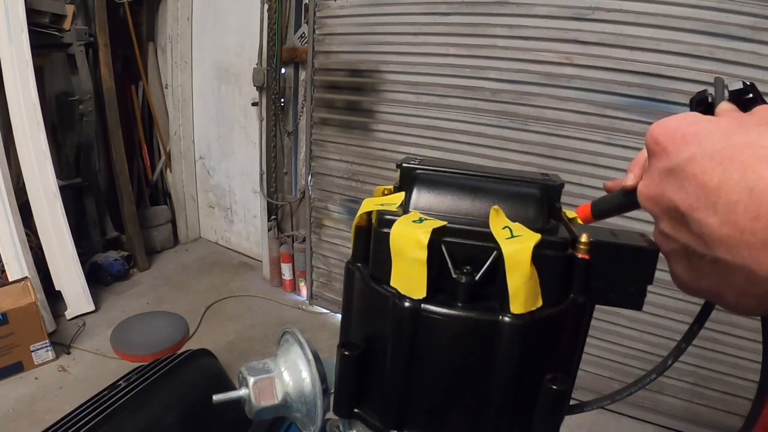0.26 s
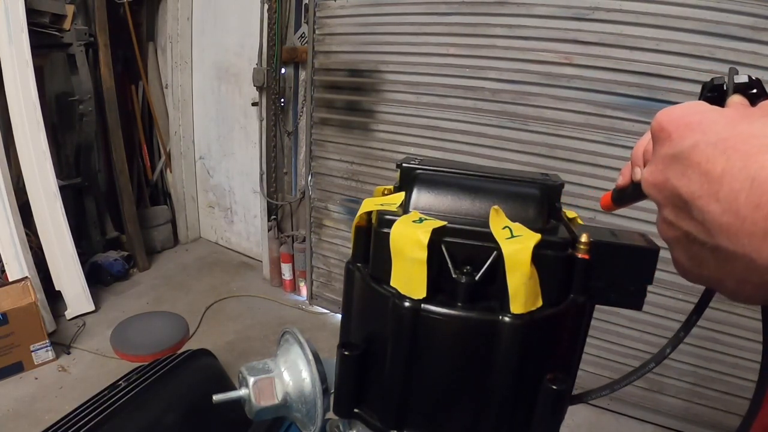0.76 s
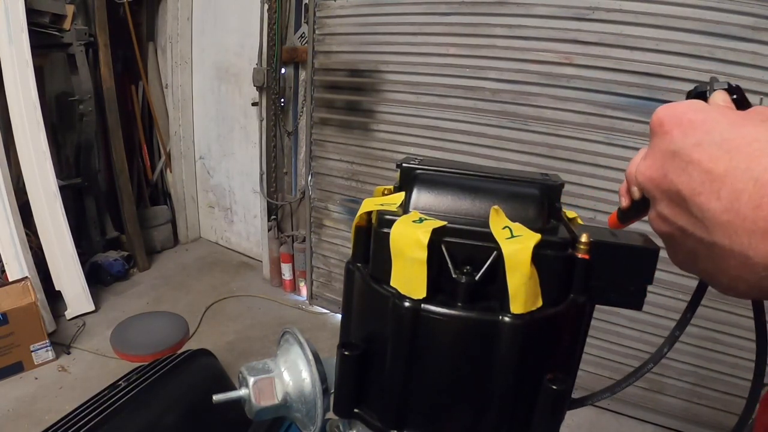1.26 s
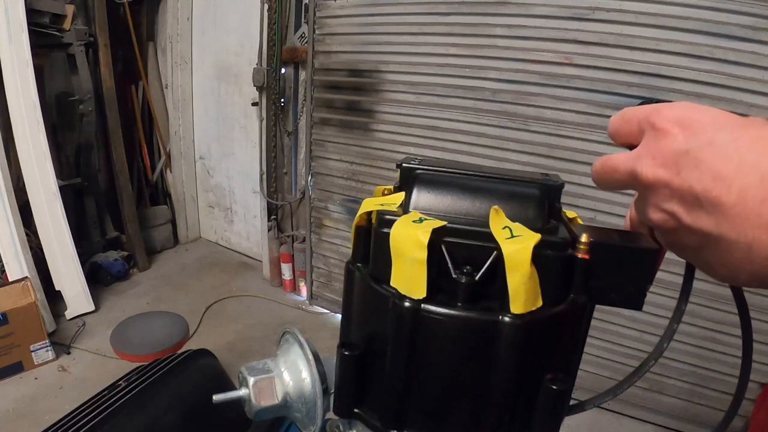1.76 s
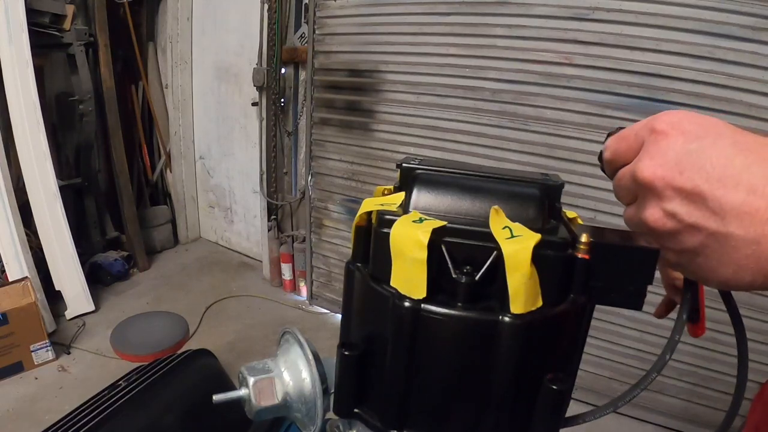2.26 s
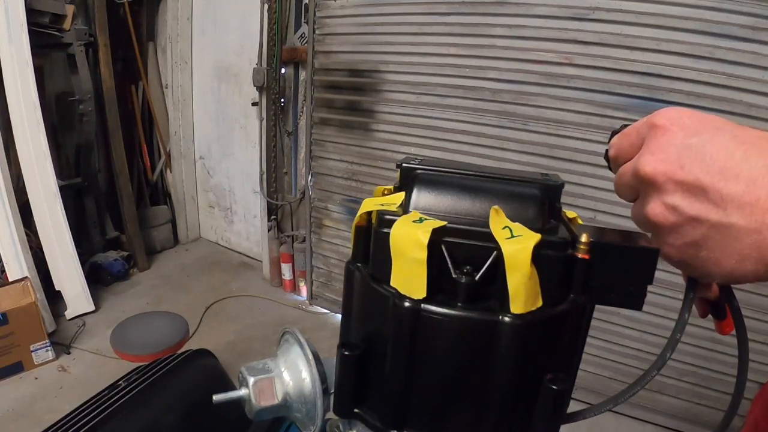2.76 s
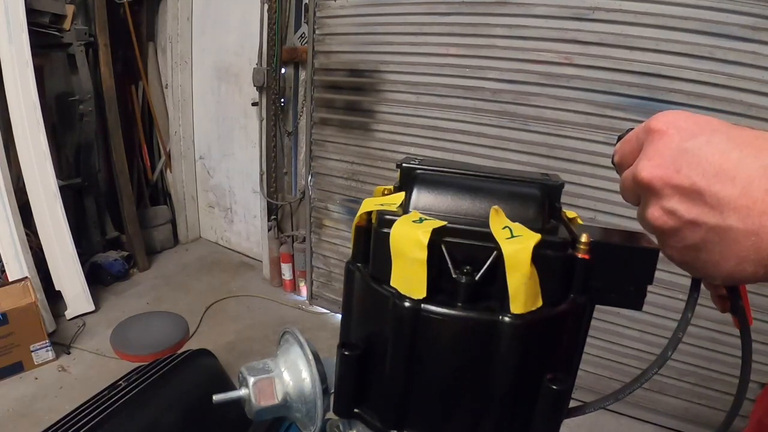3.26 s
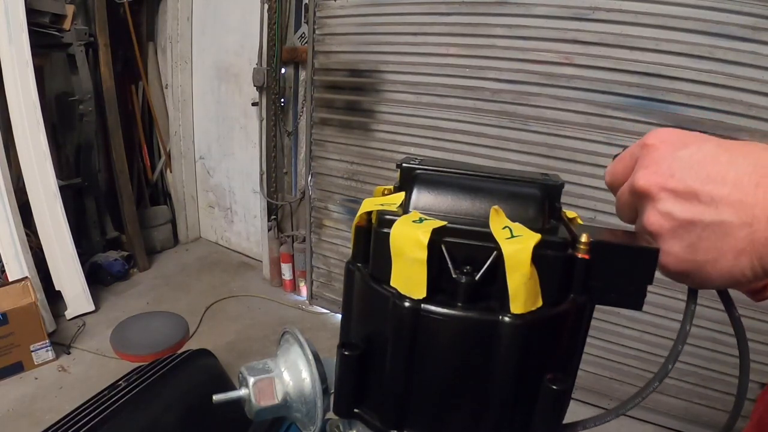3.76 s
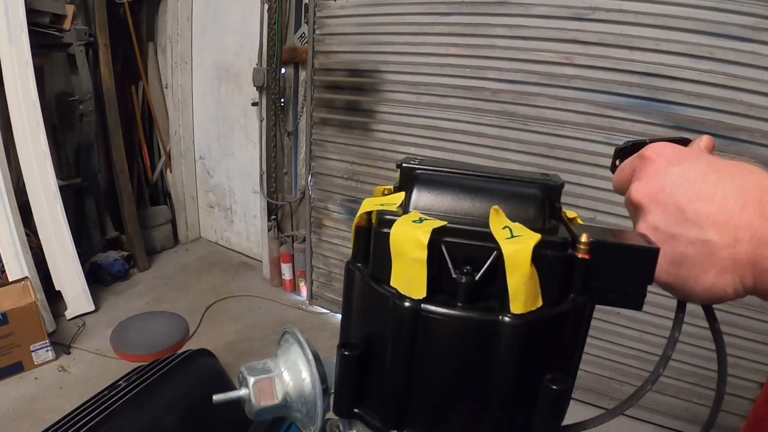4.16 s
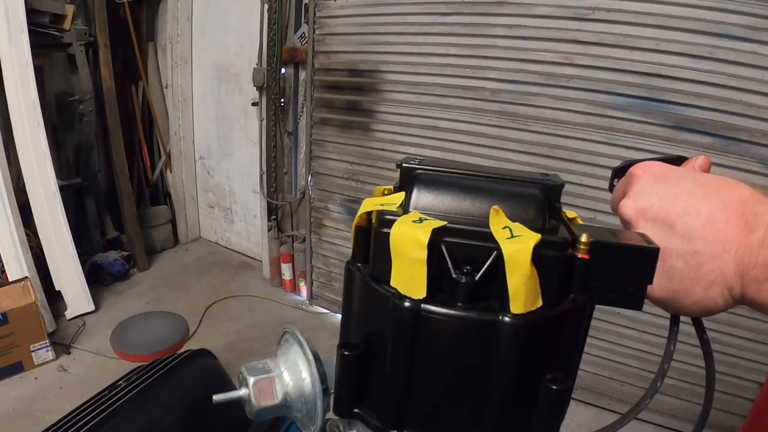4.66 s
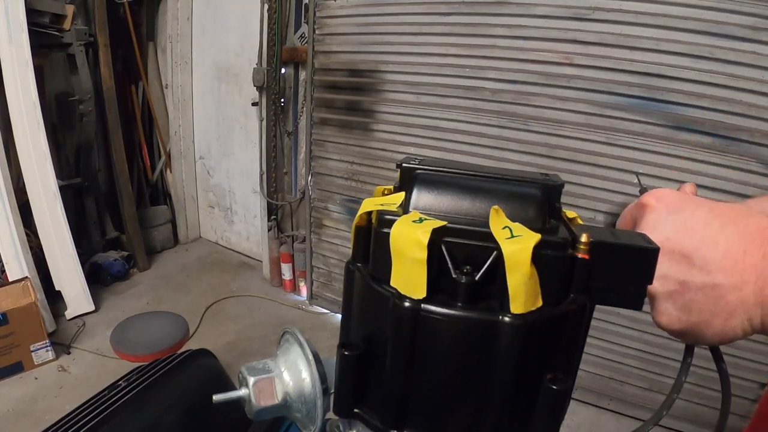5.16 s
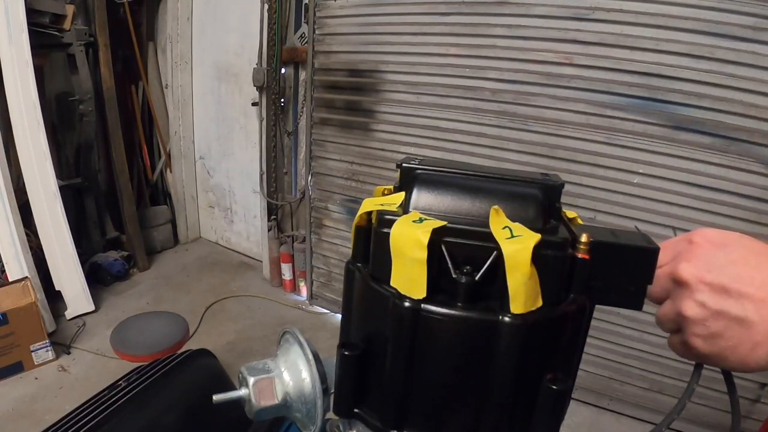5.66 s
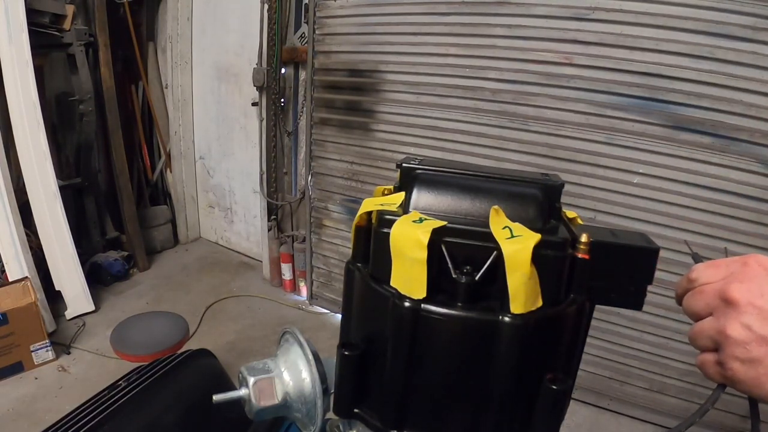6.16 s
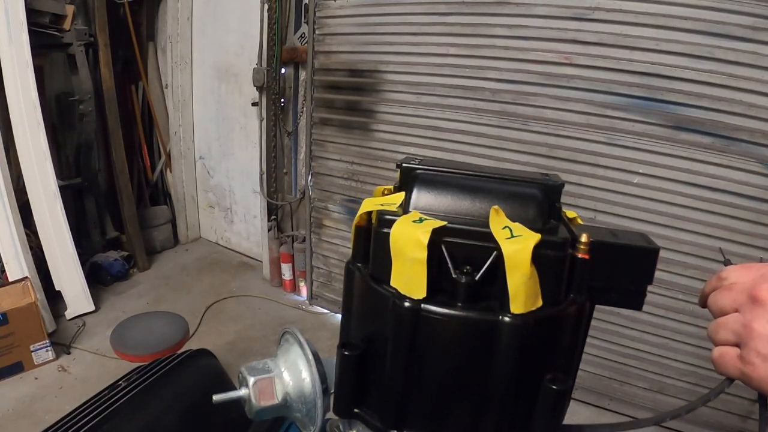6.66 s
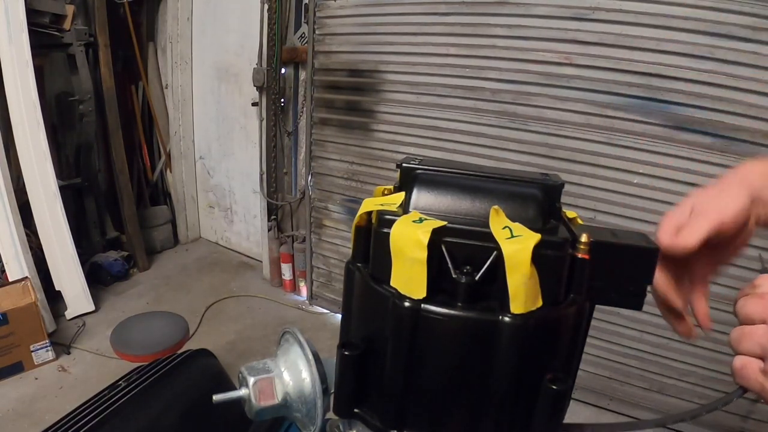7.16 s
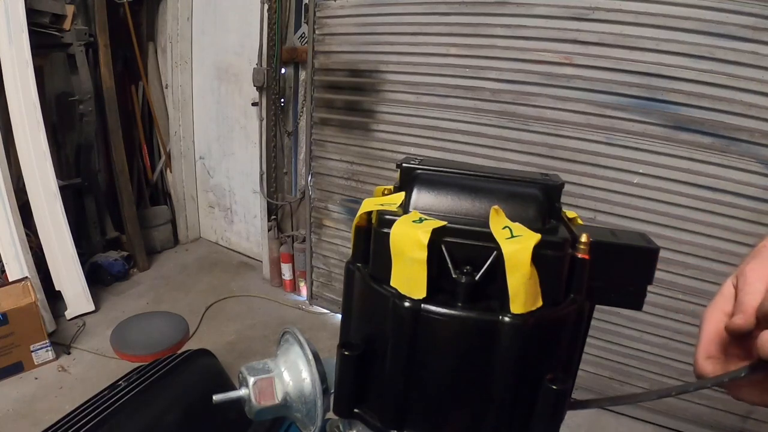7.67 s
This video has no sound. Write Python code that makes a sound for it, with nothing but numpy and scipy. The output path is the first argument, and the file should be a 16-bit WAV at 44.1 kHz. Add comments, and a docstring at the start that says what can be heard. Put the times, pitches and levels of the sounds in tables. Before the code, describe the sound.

Hand pliers ratchet on a cable terminal near the microphone, first in separate metallic clicks, then in a fast burst with a thin squeak. They slip off with a short scrape and spring open with a quick run of clicks, then land on a work top, knocking and settling. Soft rubbing of hands on rubber, steady room air and a low hum fill the slightly reverberant workshop.

```python
"""Ratcheting crimp pliers in a workshop.

The pliers are squeezed on a cable terminal: the pawl clicks over its teeth and rings the steel,
the terminal squeaks, the jaws slip off. The ratchet runs through once more as the handles spring
open; the pliers clatter on the work top, and a rough, ringing wash lingers after the knocks.
Hands rub over cable and grips. Behind it: room air, a low rumble, a swelling drone, a faint hum."""
import sys
import numpy as np
from scipy import signal
from scipy.fft import rfft, irfft
from scipy.io import wavfile
from scipy.ndimage import uniform_filter1d

SR = 44100
rng = np.random.default_rng(int(sys.argv[2]) if len(sys.argv) > 2 else 0)


def generate_wav(sig):
    """Save sig (samples, or channels by samples) to the path in sys.argv[1] as 16-bit PCM at SR."""
    pcm = np.round(np.clip(np.atleast_2d(sig).T, -1, 1) * 32767).astype(np.int16)
    wavfile.write(sys.argv[1], SR, pcm)


N = 349272
TIME_S = np.arange(N) / SR
FREQ_HZ = np.fft.rfftfreq(N, 1 / SR)

# Blows. A hard one tilts towards the treble; the spot struck favours one band.
# (time [s], contact time [s], relative energy [dB], tilt [dB/octave], favoured frequency [Hz])
RATCHET_CLICKS = [(.2444, .0015, -21.5, 2.5, 5000), (.4839, .001, -25, -5, 2400),
                  (.5797, 0.0037, -28.5, -4, 2950), (.6455, 0.0026, -30, -4.5, 2850),
                  (.8235, 0.0012, 9.5, 1.5, 2610), (1.0004, .0009, 9.5, 3, 2740),
                  (1.2313, 0.00088, 8, 4, 2870), (2.0626, 0.0009, -35, -0.5, 4000),
                  (3.5657, 0.00086, 7.5, 0.6, 4100), (3.6039, .0008, 10, 3.4, 3800),
                  (3.6313, .0008, 10, 4, 3750), (3.6593, 0.00066, 7.5, 2, 3750),
                  (3.7877, 0.0024, 8.5, -0.2, 5600), (3.8621, 0.0016, 11, 0.5, 3600),
                  (5.1013, .0009, -8.5, 4.5, 1600), (5.1718, 0.00053, 5, -2, 2370),
                  (5.2951, 0.00067, 5.5, -1.5, 4000)]  # pawl and jaws
JAW_SLIPS = [(4.8205, 0.0078, -3.5, -0.5, 1200), (4.825, 0.0017, 2.5, -0.3, 9000),
             (4.8335, 0.0029, -1, -1, 200), (4.84, 0.0036, -10, 3, 3000)]
BENCH_KNOCKS = [(6.2782, 0.0015, -2, 1.5, 850), (6.289, 0.003, 16.5, 1.4, 2130),
                (6.4838, 0.0019, 10, 0, 875), (6.5172, 0.0037, 4, -1, 695), (6.527, 0.0066, 10, -3.5, 700),
                (6.553, 0.0086, 3, -1, 3800), (6.5603, 0.0072, 18.5, 1.3, 468),
                (6.5755, 0.0054, 9.7, -0.5, 730), (6.588, 0.0077, 2, -1.5, 1400),
                (6.5985, 0.003, 3.5, 2, 4200), (6.6155, .0024, 3.5, -1, 330), (6.6795, 0.0026, 3, 5, 706),
                (6.696, 0.02, 7, -2.5, 380), (6.7165, .003, -0.5, 4.5, 550), (6.727, 0.0045, 2.5, -.3, 444)]  # pliers land, tip over, settle

# Spectral outlines of the bodies: (frequency [Hz], relative level [dB])
PLIERS_OUTLINE = [(100, -31), (500, -20), (1000, -7.5), (1450, -12), (1650, 0), (1900, -5.5), (2400, -1),
                  (4500, -5), (6000, -7.5), (10600, -12), (11800, -24.5), (13600, -28.5), (15000, -42.5),
                  (16500, -55.5)]  # steel damped by the hand
TERMINAL_OUTLINE = [(40, -22), (130, 4), (340, 1), (560, -15.5), (1200, -10.5), (10500, -27), (12000, -28),
                    (16000, -46)]  # terminal with cable
BENCH_OUTLINE = [(60, -48.5), (160, -8), (230, 2.5), (300, -1), (400, -1.5), (560, -4.5), (800, -2),
                 (1100, -10), (1500, -12.5), (2800, -20), (4500, -30), (7000, -43), (11000, -57),
                 (16000, -84)]
# Their resonances: (frequency [Hz], bandwidth [Hz], peak re outline [dB])
PLIERS_MODES = [(1726, 120, 10.5), (2430, 250, -1.5), (2840, 180, 4.5), (3670, 280, 2.5), (4170, 140, 4),
                (4480, 222, 6.5), (4960, 300, -7), (5886, 740, -3.5), (7300, 490, 1), (8650, 498, 4.5),
                (10360, 670, -1.5)]
TERMINAL_MODES = [(193, 32, 7.5), (2760, 500, 6), (5000, 330, 9), (6310, 400, 9), (10000, 520, 16)]
BENCH_MODES = [(341.3, 12.6, 13), (446, 5.5, 5), (686, 82, 4.6), (770, 60, 4), (1494, 11, 8),
               (1975, 7.5, 6), (2616, 63, 9.5), (3500, 10.4, 6)]
# The pliers ring higher with the handles wide open: (time [s], mode frequency factor [1])
GRIP_TUNING = [(1.3, 1.025), (3.5, 0.94), (3.9, .99), (5.1, 0.98)]

# Envelopes: (start [s], length [s], level [dB])
TERMINAL_SQUEAKS = [(3.66, .085, -43.5), (3.785, 0.061, -41.5)]  # one per push
KNOCK_TAILS = [(6.295, 0.17, -38.5), (6.48, 0.21, -46), (6.67, 0.026, -38)]
HAND_RUBS = [(.13, 0.39, -77), (.55, 0.63, -67), (2.65, 0.41, -78.5), (5.87, 0.22, -57.5),
             (6.25, 0.76, -63.5), (7.08, 0.26, -63.5), (7.68, 0.14, -63.5)]
# Noise spectra: (frequency [Hz], relative level [dB])
KNOCK_TAIL_SPECTRUM = [(200, -25), (780, -4), (1000, -4), (1420, -1), (1650, 1), (2000, -7), (2280, 0),
                       (2630, -2), (3100, -6.5), (4600, -14.5), (6000, -31), (11000, -53), (16000, -53)]
RUB_SPECTRUM = [(500, -35.5), (2000, 1), (4400, -1.5), (6500, -8), (10500, -17), (13000, -28),
                (16000, -52.5)]
AIR_SPECTRUM = [(15, -48), (25, -19), (82, -9), (114, -6), (166, -2), (195, -1), (285, -4), (317, -8.5),
                (476, -17.5), (531, -24), (1100, -16), (1480, -20.5), (2160, -28.5), (8500, -55.5),
                (13000, -59.5), (14500, -81)]  # room air and far rumble

# Slow drift of the rumble: (time [s], gain [dB])
RUMBLE_DRIFT = [(.2, 1.5), (1.6, -2), (2.3, 1), (4.3, -2.5), (7, -0.5), (7.9, 1)]
# Swells of the drone: (start [s], length [s], level [dB], centre [Hz])
DRONE_SWELLS = [(5.854, 0.97, -45.5, 112.4), (7.28, 0.403, -41, 107.5)]
# Reflections from nearby surfaces: (delay [s], gain [1])
REFLECTIONS = [(.0021, 0.081), (.0086, .07), (0.0129, .04)]
# Reverberation decay: (frequency [Hz], T60 [s])
REVERB_T60 = [(200, 1.14), (800, 0.07), (2000, 0.69), (4500, 0.6142), (8000, 0.48), (12000, 0.4)]
# Reverberation strength: (frequency [Hz], gain [dB])
REVERB_GAIN = [(200, -12), (800, -9), (1700, -6.5), (2800, -8.5), (4300, -6.5), (7000, -7.5), (10000, -13),
               (14000, -14.5)]
# Microphone response: (frequency [Hz], gain [dB])
MIC_RESPONSE = [(100, -1), (12500, -0.5), (16000, -7)]


def ratchet():
    """Pawl and jaws strike and ring the steel pliers."""
    return gain_of(1.18) * blows(RATCHET_CLICKS + tooth_run(), PLIERS_OUTLINE, PLIERS_MODES,
                                 chatter=0.62, room_share=0.27, favour_db=7.5, favour_octaves=0.34,
                                 tuning=GRIP_TUNING)


def tooth_run(start_s=5.1904, teeth=6, step_s=0.0111, contact_s=0.0015):
    """Blow rows for the pawl running over its teeth as the handles spring open, each a little weaker."""
    first_db, fade_db_per_s, tilt_db_per_octave, favoured_hz = 7, 20.5, 0, 1296
    return [(start_s + t, contact_s, first_db - fade_db_per_s * t, tilt_db_per_octave, favoured_hz)
            for t in step_s * np.arange(teeth)]


def jaw_slip():
    """The jaws scrape off, ringing terminal and cable."""
    return gain_of(-1.1) * blows(JAW_SLIPS, TERMINAL_OUTLINE, TERMINAL_MODES, chatter=0.91,
                                 room_share=0.68, favour_db=7, favour_octaves=0.84)


def clatter():
    """Steel head and plastic grips knock on the work top."""
    return gain_of(-0.5) * blows(BENCH_KNOCKS, BENCH_OUTLINE, BENCH_MODES, chatter=0.57,
                                 room_share=1.0, favour_db=7.5, favour_octaves=1.0)


def blows(rows, outline, modes, chatter, room_share, favour_db, favour_octaves, tuning=None):
    """Impulses with contact chatter ring a body. Returns (direct, room send with modes x room_share)."""
    size = 16384
    t, hz = np.arange(size) / SR, np.fft.rfftfreq(size, 1 / SR)
    direct_and_send = np.zeros((2, N))
    for start_s, contact_s, energy_db, tilt_db_per_octave, favoured_hz in rows:
        octaves = np.log2((hz + 1) / favoured_hz)
        spot_db = favour_db * np.exp(-(octaves / favour_octaves) ** 2)
        outline_power = gain_of(curve_at(outline, hz) + tilt_db_per_octave * octaves + spot_db) ** 2
        shift = 1 if tuning is None else np.interp(start_s, *np.transpose(tuning))
        peaks = sum(gain_of(db) ** 2 / (1 + (2 * (hz - mode_hz * shift) / width_hz) ** 2)
                    for mode_hz, width_hz, db in modes)
        force = chatter * rng.standard_normal(size) * np.exp(-t / max(contact_s, 6e-4))
        force[0] += 1
        push = rfft(force)
        # Flattened: chatter spreads the blow in time without colouring it.
        push /= minimum_phase(np.sqrt(uniform_filter1d(abs(push) ** 2, 161)))
        for mix, share in zip(direct_and_send, (1, room_share)):
            body = minimum_phase(unit_rms(np.sqrt(outline_power * (1 + share * peaks))))
            add(mix, start_s, gain_of(energy_db) * irfft(push * body))
    return direct_and_send


def knock_tail():
    """A rough, ringing wash lingers after the knocks."""
    level = strokes(KNOCK_TAILS, rise_s=0.063, release_s=0.024)
    return level * gain_of(0.9 * wander(rate_hz=120)) * noise(KNOCK_TAIL_SPECTRUM)


def squeak(pitch_hz=970, sag_hz=27.3):
    """The terminal under load: a thin, unsteady tone that sags as it gets louder."""
    level = strokes(TERMINAL_SQUEAKS, rise_s=0.04, release_s=0.035)
    hz = pitch_hz - sag_hz * level / level.max()
    hz *= 1 + 0.003 * wander(rate_hz=50)
    return level * gain_of(3.3 * wander(rate_hz=50)) * tone(hz)


def hands():
    """Skin slides over rubber: a soft, uneven hiss."""
    level = strokes(HAND_RUBS, rise_s=0.027, release_s=0.094)
    return level * gain_of(1.5 * wander(rate_hz=50)) * noise(RUB_SPECTRUM)


def workshop(direct, send, build_s=0.0057):
    """Direct sound, near reflections and a diffuse tail with a decay time per band."""
    hz, t, noise_bands = signal.stft(rng.standard_normal(SR), SR, nperseg=256)
    onset = 1 - np.exp(-(t / build_s) ** 2)
    envelope = onset * gain_of(-60 * t / curve_at(REVERB_T60, hz)[:, None])
    band_energy = SR * np.mean(envelope ** 2, axis=1, keepdims=True)
    envelope *= gain_of(curve_at(REVERB_GAIN, hz))[:, None] / np.sqrt(band_energy)
    _, tail = signal.istft(noise_bands * envelope, SR, nperseg=256)
    heard = direct + signal.fftconvolve(send, tail)[:N]
    for delay_s, gain in REFLECTIONS:
        add(heard, delay_s, gain * direct)
    return heard


def room_air(level_db=-43.5, rumble_below_hz=450):
    """Steady air noise whose low end, the far rumble, wavers."""
    air = gain_of(level_db) * noise(AIR_SPECTRUM)
    rumble = signal.sosfiltfilt(signal.butter(2, rumble_below_hz, fs=SR, output="sos"), air)
    drift_db = np.interp(TIME_S, *np.transpose(RUMBLE_DRIFT)) + 1.4 * wander(rate_hz=6)
    return air + (gain_of(drift_db) - 1) * rumble


def drone(centre_hz=97, level_db=-59):
    """A faint, deep noise band with two slightly higher swells."""
    sound = gain_of(level_db) * noise_band(centre_hz)
    for *stroke, swell_hz in DRONE_SWELLS:
        sound += strokes([stroke], rise_s=0.18, release_s=0.15) * noise_band(swell_hz)
    return sound


def hum(pitch_hz=170.6, rise_at_s=3.73, rise_s=1.8, quiet_db=-56.5, loud_db=-42):
    """A wavering low tone that comes up half-way through and stays."""
    hz = pitch_hz + 0.6 * wander(rate_hz=2)
    level = np.interp(TIME_S, [rise_at_s, rise_at_s + rise_s], gain_of([quiet_db, loud_db]))
    return level * gain_of(0.63 * wander(rate_hz=6)) * tone(hz)


def strokes(rows, rise_s, release_s):
    """Summed envelopes: linear rise, hold, exponential release."""
    level = np.zeros(N)
    for start_s, length_s, db in rows:
        attack = np.clip((TIME_S - start_s) / rise_s, 0, 1)
        release = np.exp(-np.maximum(TIME_S - start_s - length_s, 0) / release_s)
        level += gain_of(db) * attack * release
    return level


def tone(hz):
    """Unit-rms sine following a pitch curve."""
    return np.sqrt(2) * np.sin(2 * np.pi * np.cumsum(hz) / SR)


def noise(spectrum):
    """Unit-rms noise from a spectrum table."""
    return shaped_noise(gain_of(curve_at(spectrum, FREQ_HZ)))


def noise_band(centre_hz, spread_hz=28):
    """Unit-rms noise around one pitch."""
    return shaped_noise(np.exp(-((FREQ_HZ - centre_hz) / spread_hz) ** 2))


def wander(rate_hz):
    """Unit-rms random motion, rolled off above rate_hz."""
    return shaped_noise(1 / (1 + (FREQ_HZ / rate_hz) ** 4))


def shaped_noise(gains):
    """White noise weighted per frequency bin, at unit rms."""
    return unit_rms(irfft(rfft(rng.standard_normal(N)) * gains, N))


def minimum_phase(gains):
    """Spectrum of the promptest causal response with these gains."""
    cepstrum = irfft(np.log(np.maximum(gains, gains.max() * 1e-5)))
    half = len(cepstrum) // 2
    cepstrum[1:half] *= 2
    cepstrum[half + 1:] = 0
    return np.exp(rfft(cepstrum))


def curve_at(points, hz):
    """Interpolates a table over log frequency."""
    points_hz, values = np.transpose(points)
    return np.interp(np.log(hz + 1), np.log(points_hz + 1), values)


def gain_of(db):
    """Decibels to amplitude."""
    return 10 ** (np.asarray(db) / 20)


def unit_rms(x):
    """Scales to rms 1."""
    return x / np.sqrt(np.mean(x ** 2) + 1e-20)


def add(mix, start_s, sound):
    """Mixes a sound in at start_s."""
    part = mix[max(round(start_s * SR), 0):][:len(sound)]
    part += sound[:len(part)]


def near_mono(mix, side_db=-2, split_hz=11300):
    """Two channels that differ only in the top treble."""
    highpass = signal.ellip(8, 1, 60, split_hz, "high", fs=SR, output="sos")
    side = gain_of(side_db) * signal.sosfilt(highpass, mix)
    return np.array([mix + side, mix - side])


def scene():
    """Blows through the room; all other layers added dry."""
    direct, send = ratchet() + jaw_slip() + clatter()
    foreground = workshop(direct, send) + knock_tail() + squeak() + hands()
    return near_mono(foreground + room_air() + drone() + hum())


def record(dry):
    """Soft peak limiting, microphone treble fall, band limit."""
    ceiling, cutoff_hz = 1.1, 16500
    rounded = dry / (1 + (dry / ceiling) ** 4) ** 0.25
    coloured = irfft(rfft(rounded) * gain_of(curve_at(MIC_RESPONSE, FREQ_HZ)), N)
    lowpass = signal.firwin(255, cutoff_hz, window=("kaiser", 9), fs=SR)
    return signal.oaconvolve(coloured, lowpass[None], "same")


dry = scene()
out = record(dry)
generate_wav(out)
```